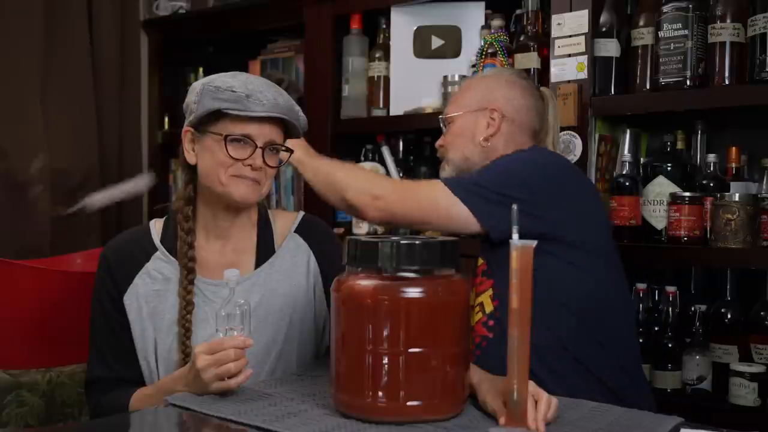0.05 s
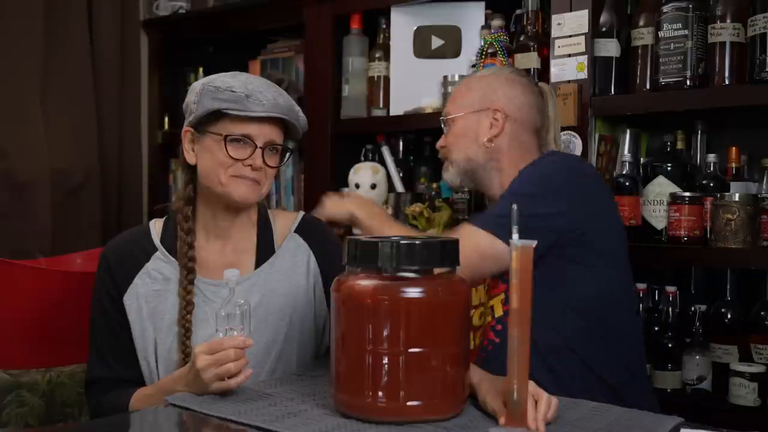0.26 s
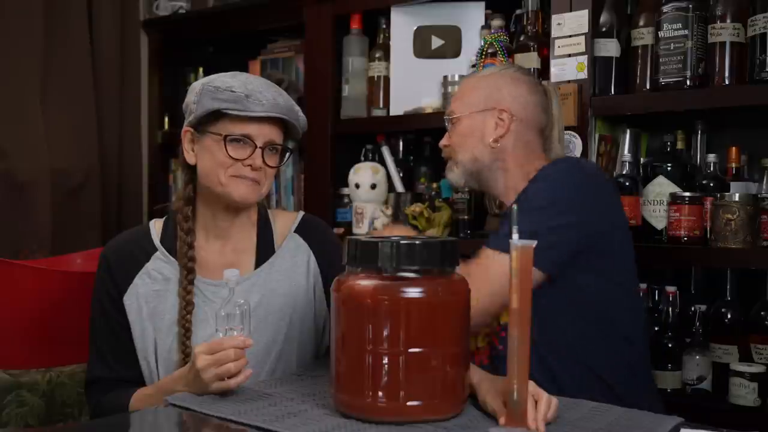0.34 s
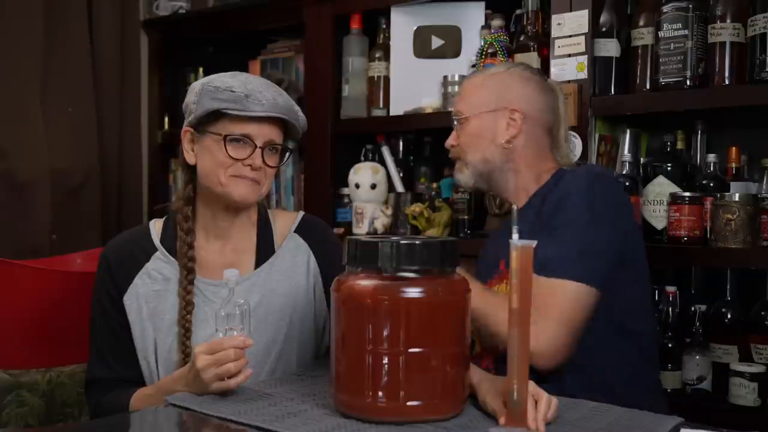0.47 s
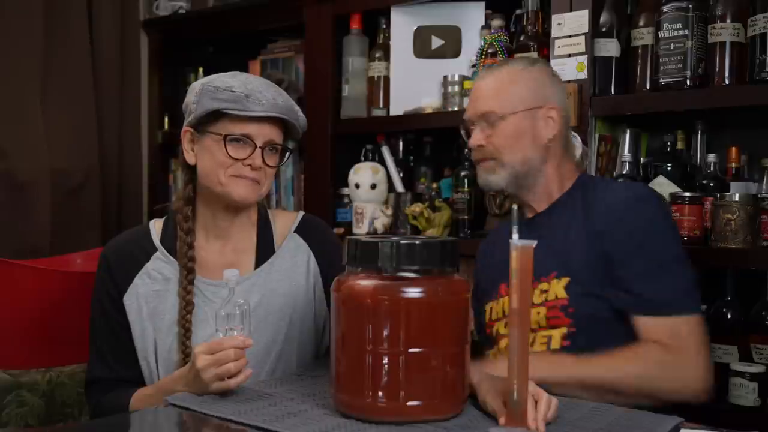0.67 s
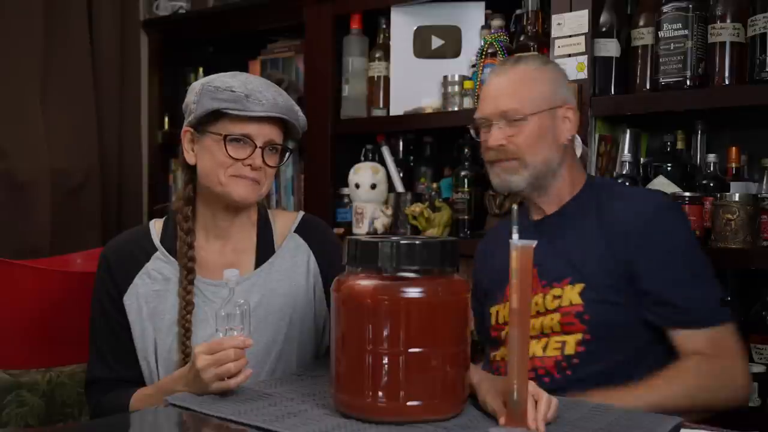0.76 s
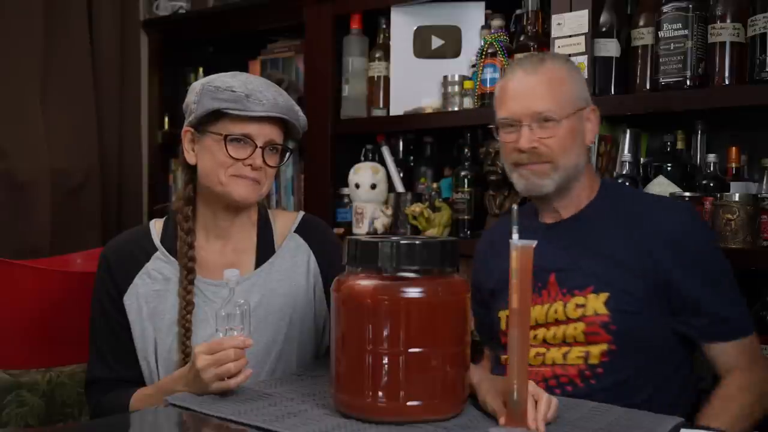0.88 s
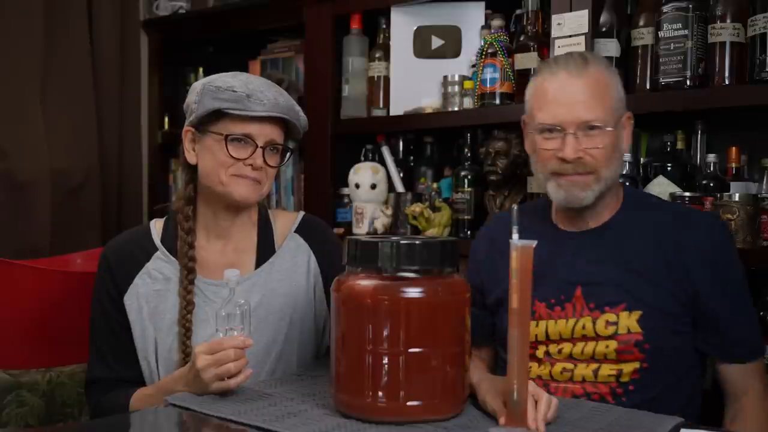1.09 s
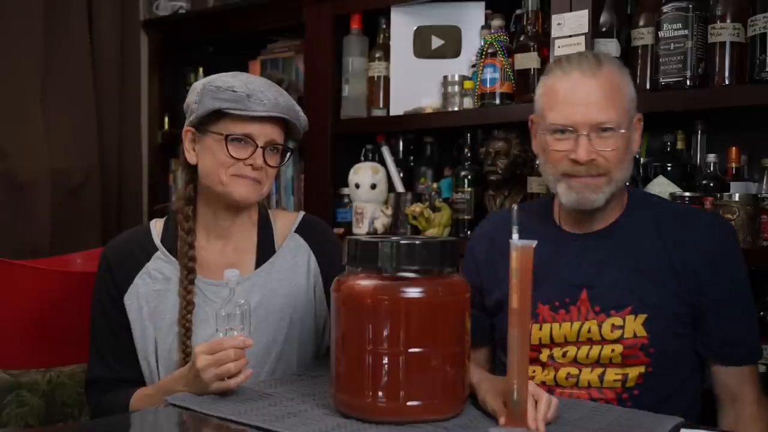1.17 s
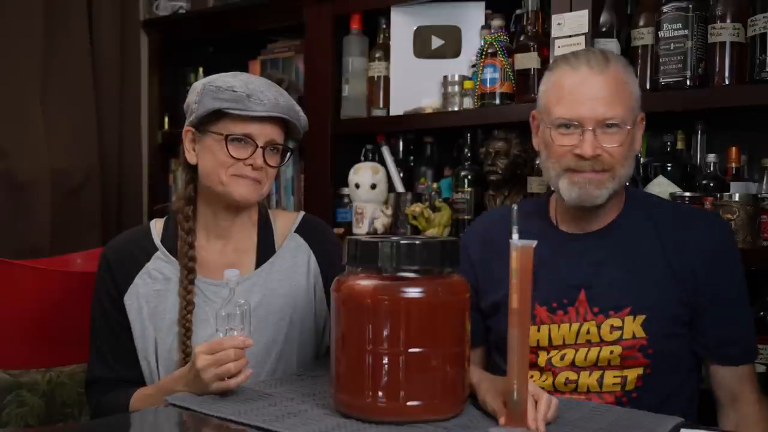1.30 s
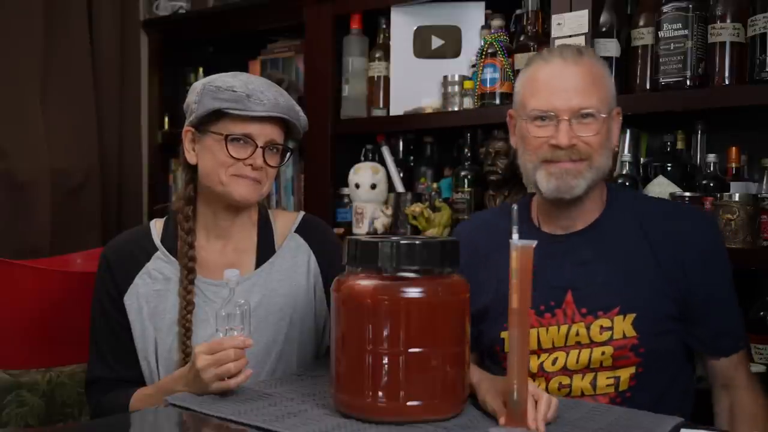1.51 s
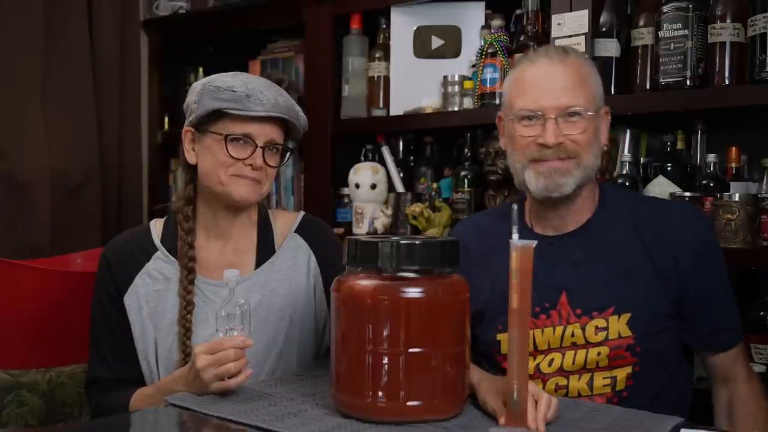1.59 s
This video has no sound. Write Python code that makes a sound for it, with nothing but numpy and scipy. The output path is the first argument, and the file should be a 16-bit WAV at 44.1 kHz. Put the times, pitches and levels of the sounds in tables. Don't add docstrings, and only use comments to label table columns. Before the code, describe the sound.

Glass smash, close and dry in a small furnished room. Only faint low hum until about 0.23 seconds, then a loud, dense burst of bright cracks, blunt knocks and brief high ringing until 0.4. Shards bounce and tinkle amid fine splinters, with another smaller break near 0.55 and 0.74. From 0.85 sparse clinks and dull taps settle on a hard floor, fading by about 1.6.

```python
import sys
import numpy as np
from scipy import signal
from scipy.fft import rfft, irfft
from scipy.io import wavfile
from scipy.ndimage import uniform_filter1d

SR = 44100
rng = np.random.default_rng(int(sys.argv[2]) if len(sys.argv) > 2 else 0)


def store_pcm(level_fs):
    pcm = np.round(np.clip(level_fs, -1, 1) * 32767).astype(np.int16)
    wavfile.write(sys.argv[1], SR, np.atleast_2d(pcm).T)


def voltage_ratio(level):
    return 10 ** (np.asarray(level, float) / 20)


N = 72765

# start in seconds, level in dB, centre in Hz, 60 dB decay time in seconds.
CRACKS = [
    (0.2537, -1, 3980, 0.052),
    (0.3066, 0.5, 5000, 0.026),
    (0.346, -3.5, 2440, 0.036),
    (0.5529, -5, 3150, 0.031),
    (0.7354, -10, 3900, 0.067),
    (1.098, -19.5, 4080, 0.041),
    (1.141, -21.5, 5000, 0.055),
    (1.25, -36.5, 4440, 0.049),
]
# frequency in Hz, level in dB.
PIECE_MODES = [(3515, -35), (5152, -27), (5742, -36), (6368, -31), (6966, -34), (7620, -35), (8333, -32),
               (8990, -34), (9593, -32), (10070, -32), (10982, -30), (12100, -37), (13361, -39),
               (14745, -43)]
# start in seconds, level in dB, moment of damping in seconds.
PIECE_BLOWS = [
    (.2532, 14, 0.29),
    (.294, 12, 0.53),
    (.3085, 3.5, 0.16),
    (.331, -3, 0.28),
    (.349, -0.5, 0.37),
]
# start in seconds, level in dB, 60 dB decay time of the ring
# in seconds.
SHARDS = [(0.2301, -5, 0.067), (0.2935, -4, 0.037), (0.3184, -3.5, 0.05), (0.3491, -1.5, 0.023),
          (0.3855, -9.5, 0.053), (0.4024, -6, 0.023), (0.4267, -24.5, 0.033), (0.4565, -14, 0.07),
          (0.4946, -12.5, 0.036), (0.5011, -18, 0.1), (0.5115, -15.5, 0.1), (0.578, -23, 0.06),
          (0.591, -22, 0.07), (0.611, -20, 0.089), (0.6314, -13, 0.065), (0.656, -24, 0.026),
          (0.679, -14.5, 0.067), (0.685, -17, 0.035), (0.698, -18.5, 0.057), (0.7404, -22, 0.074),
          (0.763, -25, 0.066), (0.7899, -32, 0.18), (0.8133, -28, 0.042),
          (0.869, -32, 0.13), (0.8762, -25.5, 0.071), (0.9092, -30, 0.16), (0.9424, -21.5, 0.15),
               (0.9922, -29, 0.049), (1, -27, 0.04), (1.0596, -17.5, 0.069), (1.073, -18, 0.088),
               (1.099, -22, 0.023), (1.1413, -35, 0.061), (1.2256, -33.5, 0.051), (1.2996, -33, 0.059),
               (1.346, -41, 0.033), (1.359, -49.5, 0.056), (1.409, -51, 0.034), (1.469, -34, 0.034),
               (1.48, -38, 0.07), (1.496, -37.5, 0.088), (1.5271, -36, 0.073), (1.558, -40, 0.089),
               (1.5828, -42, 0.067), (1.594, -40, 0.044)]
# four frequencies in Hz, strongest first.
SHARD_MODES = [(11890, 8560, 1880, 3140), (2370, 5760, 8480, 4110), (10070, 6380, 4070, 1950),
               (4020, 2380, 12040, 8130), (5310, 8610, 3170, 10070), (7550, 10370, 3370, 8530),
               (3880, 6580, 2670, 8330), (8110, 11690, 10230, 1960), (5450, 3190, 10280, 7460),
               (11410, 5740, 4920, 6560), (3880, 3200, 6590, 8800), (6130, 5260, 2100, 8370),
               (3770, 5270, 3140, 5680), (4200, 2990, 5250, 6700), (5780, 2490, 4750, 10400),
               (5380, 9770, 4160, 12120), (7200, 5330, 10400, 9200), (1860, 3660, 6120, 5490),
               (6130, 3460, 4080, 8340), (7260, 5380, 2240, 3540), (6130, 3300, 7840, 4160),
               (4440, 3820, 4960, 3170), (6300, 3000, 9560, 2610),
               (4160, 6830, 6140, 10610), (4140, 2840, 10620, 6070), (6770, 7940, 5540, 7290),
              (4920, 6660, 3530, 2290), (5550, 7400, 4590, 6930), (6810, 4430, 2310, 10500),
              (10030, 7240, 3980, 14320), (4610, 3280, 8000, 6590), (4820, 4190, 2340, 6570),
              (5520, 4210, 6010, 3350), (10150, 4180, 3350, 5580), (10170, 6830, 4050, 3520),
              (10230, 6800, 4340, 12900), (10240, 4190, 3640, 4730), (10210, 8830, 2600, 3430),
              (7380, 5500, 10240, 6840), (7890, 4150, 3470, 2710), (4930, 11700, 3240, 8900),
              (9110, 15100, 7230, 5430), (7900, 7260, 9240, 2970), (15040, 7290, 9170, 12700),
              (9160, 7300, 5530, 10850)]
MODE_DB = [-9.5, -15, -18, -20]
RING_DB = [0, -2, -1, -2, -2, 0, 6.5, 2, 0, -1, 3, 1.5, -2, 2, -5, 2.5, -4.5, 4.5, 6.5, -6.5, 2, 4.5, 1, 3,
           -2.5, -4, -1.5, 2, 0.5, 3, -2.5, 1, 7.5, -6, -6, 1, 11.5, 0, 0, -1, -0.5, 4, 3, 5, 3]
# start in seconds, level in dB, frequency in Hz, number of swings.
TAPS = [(.2268, -16, 1540, 3.6), (0.2868, -17, 1170, 7.6), (.3088, -10, 1790, 2.9), (.326, -10, 1160, 4.3),
        (0.342, -5.5, 2200, 1.9), (0.345, -4.5, 1680, 4.8), (.539, -19.5, 790, 1.6),
        (0.5537, -11.5, 2530, 1.5), (0.7247, -33, 294, 1.2), (.684, -20, 2020, 4.4),
        (0.8548, -19, 880, 0.97), (.858, -23.5, 1220, 1.4), (0.9037, -28.5, 606, 2.4),
        (1.0215, -26, 510, 2), (1.04, -34, 3000, 1.6), (1.1205, -35, 3030, 1.5), (1.134, -29, 2020, 1.2),
        (1.169, -31.5, 495, 1.2), (1.177, -26, 1130, 1.3), (1.189, -37, 700, 2), (1.226, -50.5, 890, 1.9),
        (1.319, -40.5, 600, 3.5), (1.3253, -35.5, 3540, 2.1), (1.382, -30.5, 1300, 1.1),
        (1.432, -42, 3800, 1.6)]
# start in seconds, level in dB, frequency in Hz, 60 dB decay time in seconds.
KNOCKS = [(.237, -16, 1043, 0.21), (.253, -16, 265, 0.076), (.27, -20.5, 310, 0.031),
          (0.305, -22, 239, 0.073), (.349, -9, 1208, 0.047), (0.344, -41, 61, 0.13),
          (.368, -10.5, 550, 0.03), (0.372, -12.5, 1376, 0.037), (0.524, -22, 209, 0.036),
          (0.55, -23, 261, 0.07), (0.722, -31, 220, 0.064), (0.736, -19, 757, 0.05),
          (0.914, -27.5, 246, 0.019), (1.0, -31.5, 730, 0.068), (1.058, -27.5, 810, 0.051),
          (1.262, -38.5, 710, 0.029), (1.384, -31.5, 1100, 0.014)]
# time in seconds, fine spray in dB, heavy tumble in dB.
DEBRIS = [(.227, -21.5, -41), (.26, -17.5, -36), (.33, -20.5, -26.5), (0.379, -25.5, -29),
          (0.474, -34, -41.5), (0.543, -31.5, -32.5), (.62, -43.5, -40), (0.801, -35.5, -44),
          (.85, -52, -47), (1.0, -48.5, -54.5), (1.15, -57.5, -54), (1.65, -62, -66)]
# frequency in Hz, density in dB per Hz.
SPRAY_COLOUR = [(150, -44), (600, 3), (1500, 1), (5000, -1), (11000, -5), (13500, -8), (16000, -36)]
# frequency in Hz, 60 dB decay time in seconds.
ROOM_DECAY = [(200, 0.1), (2000, 0.065), (12000, 0.055)]
# frequency in Hz, density in dB per Hz.
HUM_COLOUR = [(15, -62), (25, -22), (59, -5.5), (206, -4.5), (263, -11.5), (309, -3.5), (363, -12),
              (2840, -31), (16000, -48)]


def evened(x):
    return x / np.sqrt(np.mean(x ** 2) + 1e-20)


def wander(shape, samples):
    noise = rng.standard_normal(shape)
    return evened(uniform_filter1d(uniform_filter1d(noise, samples), samples))


def read(points, hz):
    f, value = np.transpose(points)
    return np.interp(np.log(hz + 1), np.log(f + 1), value)


def add(mix, s, sound):
    part = mix[round(s * SR):][:len(sound)]
    part += sound[:len(part)]


def coloured(x, points):
    gain = voltage_ratio(read(points, np.fft.rfftfreq(x.shape[-1], 1 / SR)))
    return irfft(rfft(x) * gain, x.shape[-1])


def band(x, lo_hz, hi_hz):
    edges = np.clip([lo_hz, hi_hz], 20, SR / 2.2)
    return signal.sosfilt(signal.butter(2, edges, "bandpass", fs=SR, output="sos"), x)


def dying(t, t60, rise_s=0.00096):
    return np.minimum(t / rise_s, 1) * voltage_ratio(-60 * t / t60)


def crack(db, hz, t60):
    t = np.arange(4000) / SR
    burst = evened(band(rng.standard_normal(len(t)), hz / 2.73, hz * 1.56))
    return voltage_ratio(db - 9) * burst * dying(t, t60, 0.00057)


def piece(s, db, damped):
    t = np.arange(8000) / SR
    hz, level_db = np.transpose(PIECE_MODES)[:, :, None]
    draw = rng.random((len(PIECE_MODES), 2))
    t60 = 0.4 * (5000 / hz) ** 0.8
    swing = np.sin(2 * np.pi * (hz * t + draw[:, 1:]))
    modes = voltage_ratio(level_db - 6 * draw[:, :1]) * swing * dying(t, t60)
    contact_db = 3800 * np.maximum(t - (damped - s), 0)
    return voltage_ratio(db - contact_db) * modes.sum(0)


def shard(db, t60, ring_db, *modes_hz):
    floor_hz, stagger_s = 2043, 0.003
    t, draw = np.arange(6000) / SR, rng.random((26, 3))
    grit = evened(band(band(rng.standard_normal(len(t)), floor_hz, 11500), floor_hz, SR))

    hz = floor_hz + (15500 - floor_hz) * draw[:, :1] ** 1.1
    cluster_db = -20 - 8 * draw[:, 1:2] - hz / 2100
    cluster_t60 = t60 * (0.5 + 0.5 * draw[:, 2:])
    cluster = voltage_ratio(cluster_db) * np.sin(2 * np.pi * hz * t) * dying(t, cluster_t60)

    rattle = voltage_ratio(1.5 * evened(uniform_filter1d(uniform_filter1d(rng.standard_normal((4, len(t))), 90), 90)))
    late = np.maximum(t - stagger_s * draw[:4, 1:2], 0)
    life = t60 * np.array([[1], [0.75], [0.6], [0.55]])
    swing = np.sin(2 * np.pi * np.array(modes_hz)[:, None] * late)
    main = rattle * voltage_ratio(np.array(MODE_DB)[:, None]) * swing * dying(late, life, 0.0013)

    puff = voltage_ratio(-11.5) * grit * dying(t, 0.56 * t60)
    return voltage_ratio(db) * (voltage_ratio(ring_db) * main.sum(0) + voltage_ratio(5) * cluster.sum(0) + puff)


def tap(db, hz, swings):
    turns = hz * np.arange(1500) / SR
    return -voltage_ratio(db + 1.5) * np.sin(2 * np.pi * turns) * voltage_ratio(-20 * turns / swings)


def knock(db, hz, t60):
    t = np.arange(4000) / SR
    skin = evened(band(rng.standard_normal(len(t)), hz / 1.4, hz * 1.6))
    skin = skin * np.linalg.norm(dying(t, t60)) / np.linalg.norm(skin * dying(t, t60))
    return voltage_ratio(db) * (0.5 * np.sin(2 * np.pi * hz * t) + 0.5 * skin) * dying(t, t60, 0.001)


def grains(spread_db, per_s, low_hz, span, t60, colour):
    struck = rng.random
    size_db = spread_db * np.minimum(rng.exponential(1, N), 4)
    size = voltage_ratio(size_db) * (struck(N) < per_s / SR)
    kind, t, out = rng.integers(0, 30, N), np.arange(2500) / SR, np.zeros(N)
    for k, (pitch, life) in enumerate(rng.random((30, 2))):
        hz = low_hz * span ** pitch
        ping = voltage_ratio(read(colour, hz)) * np.sin(2 * np.pi * hz * t) * dying(t, t60 * (1 + life))
        out += signal.oaconvolve(size * (kind == k), ping)[:N]
    return evened(out)


def debris():
    t, (s, fine_db, heavy_db) = np.arange(N) / SR, np.transpose(DEBRIS)
    flicker = voltage_ratio(2.55 * wander(N, 200))
    hiss = evened(coloured(rng.standard_normal(N), SPRAY_COLOUR)) * flicker
    tinkle = grains(spread_db=4.5, per_s=730, low_hz=2200, span=7.4, t60=0.031, colour=SPRAY_COLOUR)
    spray = voltage_ratio(-0.5) * hiss + voltage_ratio(-7) * tinkle
    clatter = grains(spread_db=4, per_s=1500, low_hz=180, span=11, t60=0.02,
                     colour=[(200, -2.5), (1300, 0.12)])
    clatter = band(clatter, 180, 2400)
    start = np.clip((t - s[0] + 0.0019) / 0.0012, 0, 1)
    return start * (voltage_ratio(np.interp(t, s, fine_db)) * spray + voltage_ratio(np.interp(t, s, heavy_db)) * clatter)


def side_image(glass):
    decay = np.arange(1500)
    smear = rng.standard_normal(1500) * voltage_ratio(-decay * 0.14)
    treble = band(glass, 5000, 25000) + 0.16 * band(glass, 393, 5000)
    side = voltage_ratio(-9.5) * signal.oaconvolve(treble, smear / np.linalg.norm(smear))[:N]
    side = side * wander(N, 250)
    return np.array([side, -side])


def room(x):
    taps = np.zeros((2, 16000))
    at = np.arange(100, 15980, 20) + rng.integers(0, 20, (2, 794))
    np.put_along_axis(taps, at, rng.choice([-1., 1.], at.shape), 1)
    hz, t, z = signal.stft(taps, SR, nperseg=256)
    decay = voltage_ratio(-60 * t / read(ROOM_DECAY, hz)[:, None])
    tail = signal.istft(z * decay, SR, nperseg=256)[1]
    return signal.fftconvolve(x[None], tail / np.linalg.norm(tail[0]), axes=1)[:, :N]


def hum():
    low, air = rng.standard_normal((2, N))
    air = voltage_ratio(-87) * evened(band(band(air, 4500, 15000), 4500, 15000))
    return voltage_ratio(-50) * evened(coloured(low, HUM_COLOUR)) + np.array([air, -air])


def scene():
    glass = debris()
    shards = zip(SHARDS, RING_DB, SHARD_MODES)
    for (s, *row), ring_db, modes in shards:
        add(glass, s, shard(*row, ring_db, *modes))
    for source, events in [(crack, CRACKS), (knock, KNOCKS), (tap, TAPS)]:
        for s, *row in events:
            add(glass, s, source(*row))
    for row in PIECE_BLOWS:
        add(glass, row[0], piece(*row))
    centre = glass * voltage_ratio([[0.3], [-0.3]])
    return centre + side_image(glass) + voltage_ratio(-12) * room(glass) + hum()


def band_limit(x):
    return signal.sosfilt(signal.butter(12, 16810, fs=SR, output="sos"), x)


def record(dry):
    x = signal.sosfilt(signal.butter(2, 40, "highpass", fs=SR, output="sos"), dry)
    treble_limit = signal.firwin(511, 15800, window=("kaiser", 9), fs=SR)
    x = signal.oaconvolve(x, treble_limit[None], "same")
    x = 0.95 * np.tanh(x / 0.95)
    return band_limit(x)


dry = scene()
out = record(dry)
store_pcm(out)
```